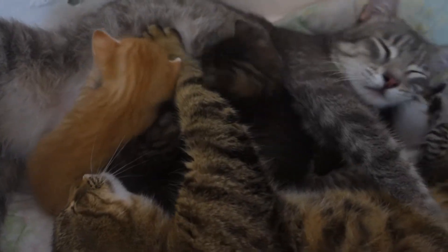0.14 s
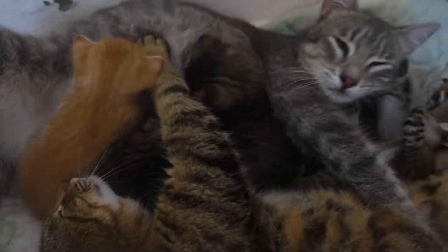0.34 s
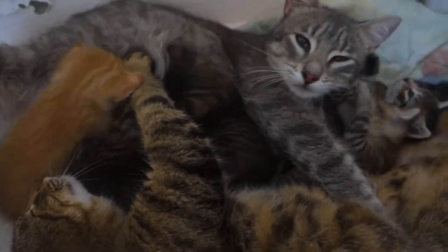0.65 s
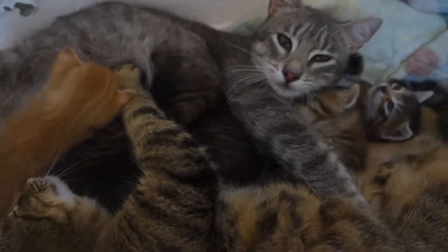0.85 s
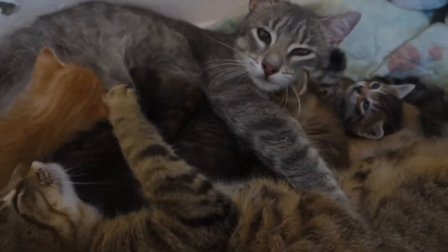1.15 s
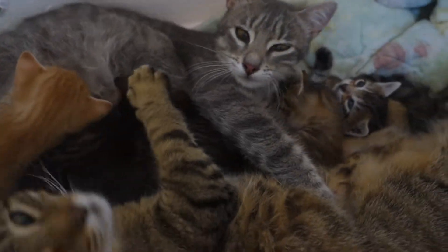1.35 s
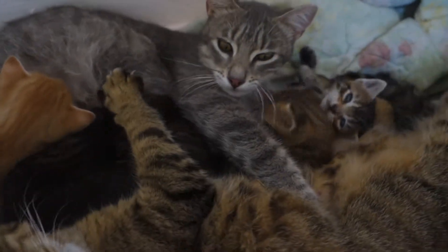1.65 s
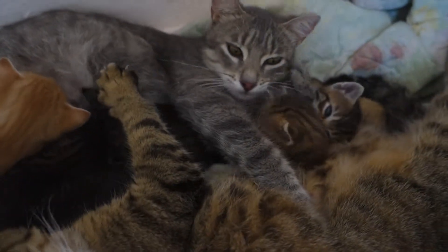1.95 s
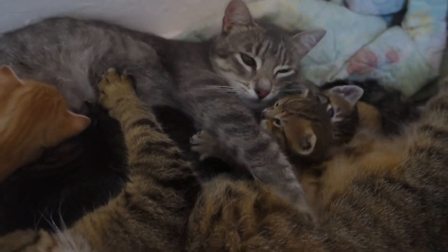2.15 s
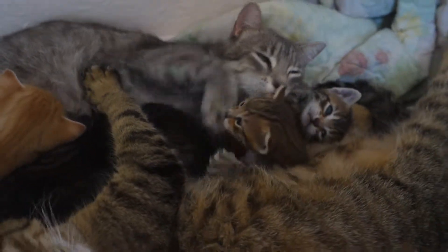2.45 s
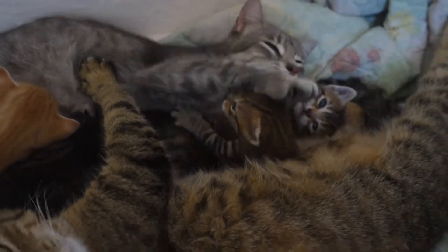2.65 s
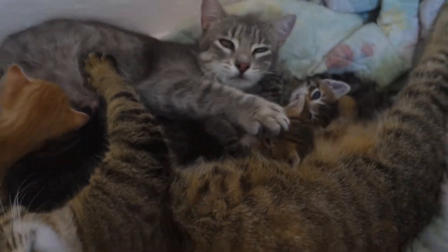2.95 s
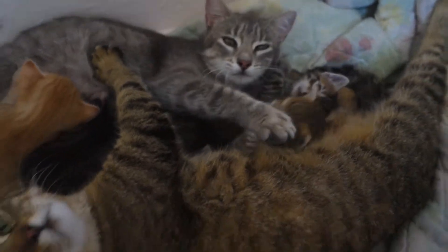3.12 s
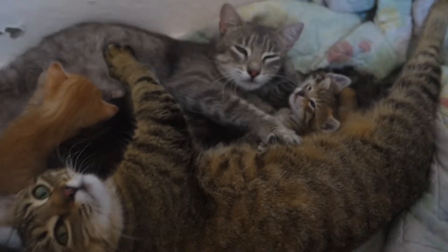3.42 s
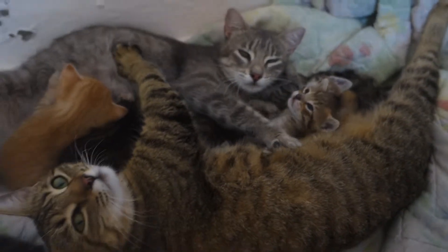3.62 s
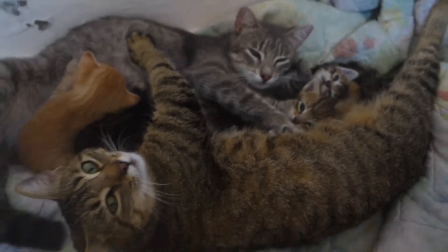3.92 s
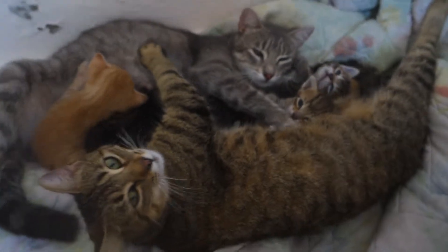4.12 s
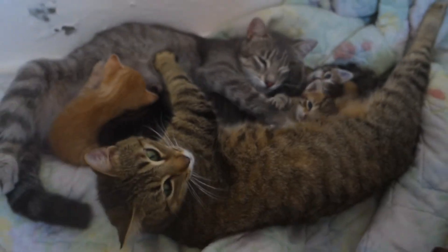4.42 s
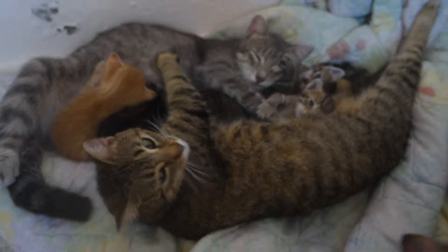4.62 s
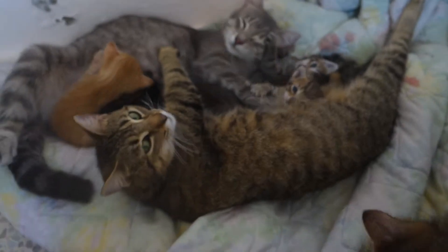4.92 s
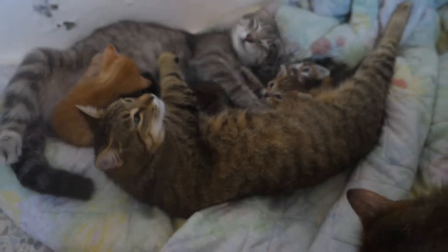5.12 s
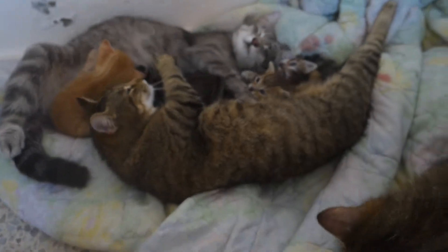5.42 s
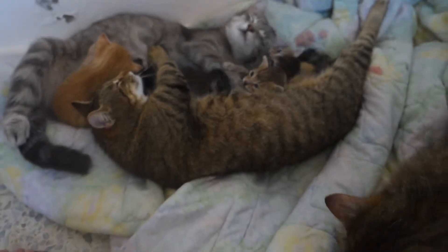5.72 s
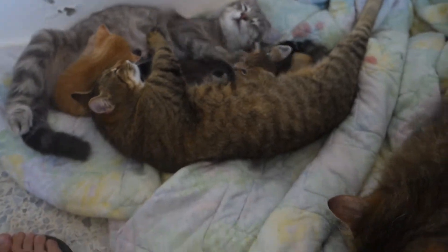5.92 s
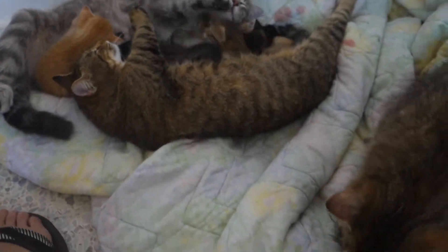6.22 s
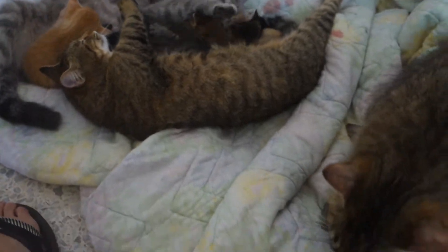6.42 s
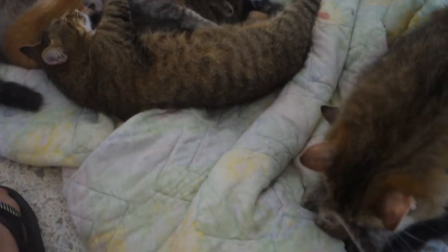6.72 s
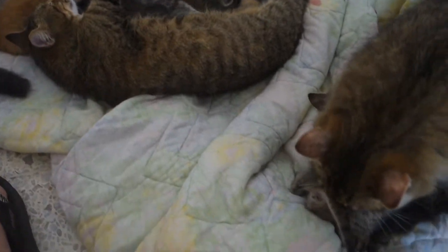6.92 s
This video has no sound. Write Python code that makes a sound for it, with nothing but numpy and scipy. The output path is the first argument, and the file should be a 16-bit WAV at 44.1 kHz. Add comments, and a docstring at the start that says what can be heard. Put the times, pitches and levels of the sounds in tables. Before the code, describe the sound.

Four high kitten calls, spaced one to two seconds apart, ring for about a second off hard walls. Between them an adult cat makes three soft, fluttering, low-pitched trills. The microphone is close on the bedding, catching brushing fur, a few tiny claw snags and faint whistling tones, over a steady low hum with shifting rumble and soft hiss. The second mew and the loudest ticks sit to the left.

```python
"""Mains hum, air rumble and microphone hiss lie under all, as sines and band-shaped noise, while a kitten
on a bed in a bare, echoing room is already in its first of four mews: partials coloured by a throat.
Bedding rustles as grainy noise; a grown cat answers in three rolled trills, a low voice chopped into puffs.
Thin whistles glide by as single sines; a few claw ticks, scattered among the calls, are noise snaps and
short ringing modes. Decaying noise, convolved with the voices, whistles and ticks, gives the echo."""
import sys
import numpy as np
from scipy import signal
from scipy.io import wavfile

SR = 44100
rng = np.random.default_rng(int(sys.argv[2]) if len(sys.argv) > 2 else 0)


def generate_wav(signal):
    """Clip the signal to [-1, 1] and save it as 16-bit WAV at the path in sys.argv[1]."""
    frames = np.transpose(np.atleast_2d(signal))
    scaled = np.clip(frames, -1, 1) * 32767
    pcm = np.round(scaled).astype(np.int16)
    wavfile.write(sys.argv[1], SR, pcm)


N = 311326   # samples


def amp(db):
    """Level law: decibels to amplitude gain."""
    return 10 ** (np.asarray(db) / 20)


def rms_one(x):
    """Normalisation: scale to an rms of 1."""
    return x / np.sqrt(np.mean(x ** 2) + 1e-20)


def in_time(rows, t):
    """Linear interpolation: the columns of a curve at times t."""
    s, *columns = np.transpose(rows)
    return [np.interp(t, s, c) for c in columns]


def at_hz(points, hz):
    """Spectral interpolation: read a curve on a log-frequency axis."""
    point_hz, value = np.array(points).T
    return np.interp(np.log(hz), np.log(point_hz), value)


def drift(rate_hz, size):
    """Slow random modulation: noise through two one-pole low-passes, run in, zero mean and spread 1."""
    r = np.exp(-2 * np.pi * rate_hz / SR)
    slow = signal.lfilter([1], [1, -2 * r, r * r], rng.standard_normal(size + SR))[SR:]
    return rms_one(slow - slow.mean())


def band_noise(low_hz, high_hz, size, order=2):
    """Band-limited noise: white noise through a band-pass, run in, rms 1."""
    sos = signal.butter(order, [low_hz, high_hz], "band", fs=SR, output="sos")
    return rms_one(signal.sosfilt(sos, rng.standard_normal(size + 8000))[8000:])


def running_phase(hz):
    """Phase is the time integral of frequency, in radians."""
    return 2 * np.pi * np.cumsum(hz) / SR


def panned(x, pan_db):
    """Interchannel level difference: two channels, left minus right in dB."""
    return np.array([x * amp(pan_db / 2), x * amp(-pan_db / 2)])


LEAD = int(.2 * SR)   # samples before the start, so that earlier sound still echoes


def span(start_s, end_s, fade_s):
    """Envelope gating: sample indices (lead-in counted), times and soft ends of one event."""
    t = np.arange(int(start_s * SR), min(int(end_s * SR), N)) / SR
    ends = np.clip(np.minimum(t - t[0], t[-1] - t) / fade_s, 0, 1)
    return np.round(t * SR).astype(int) + LEAD, t, ends


# interchannel likeness of diffuse noise: (frequency_hz, likeness from -1 to 1)
CHANNEL_LIKENESS = [(60, 1.0), (150, 1.0), (380, 0.97), (950, 0.81), (2380, 0.44), (5980, -0.047),
                    (15000, -0.16)]


def bands(size):
    """Interchannel coherence: third-octave stereo noise with its centre, the channels alike in the bass."""
    edges_hz = 20 * 2 ** np.arange(0, 9.8, 1 / 3)
    white = rng.standard_normal((2, 2, size))   # neighbouring bands get unrelated noise
    for k, (low, high) in enumerate(zip(edges_hz, edges_hz[1:])):
        sos = signal.butter(2, [low, high], "band", fs=SR, output="sos")
        mid, side = signal.sosfilt(sos, white[k % 2])
        hz = np.sqrt(low * high)
        alike = np.clip(at_hz(CHANNEL_LIKENESS, hz), -1, 1)
        yield hz, np.sqrt(1 + alike) * mid + np.sqrt(1 - alike) * side * [[1], [-1]]


# levels of the two rumbles of the house: (time_s, low_band_db, upper_band_db)
RUMBLE_LEVELS = [(0, -46.5, -55.5), (1.8, -48, -55), (2.3, -48, -89), (2.9, -45.5, -53.5),
                 (3.4, -48.5, -75.5), (5.56, -51.5, -51), (6.35, -53, -52), (6.7, -51.5, -47.5),
                 (7.06, -51.5, -49)]
# relative spectral density of air and hiss: (frequency_hz, density_db_per_hz)
AIR_SPECTRUM = [(12, -38), (20, -23), (44, -14), (66, -9.5), (80, 0), (100, -12.5), (130, -21),
                (208, -24.5), (283, -16), (601, -25), (1140, -27), (1510, -35), (2710, -39.5), (3200, -45),
                (8040, -50.5), (15700, -50.5)]
AIR_DB = -43.5
HUM_HZ, HUM_DB, HUM_FADE_DB_PER_S = 60, -34.5, 0.22


def background(patchy_db):
    """Superposition of lasting sources: a slowly fading hum, two changing rumbles, and air with hiss."""
    t = np.arange(N) / SR
    low_db, upper_db = in_time(RUMBLE_LEVELS, t)
    hum = np.sqrt(2) * amp(HUM_DB - HUM_FADE_DB_PER_S * t) * np.sin(2 * np.pi * HUM_HZ * t)
    rumble = amp(low_db) * band_noise(67.0, 185, N, order=5)
    rumble += amp(upper_db) * band_noise(217.7, 263.4, N, order=4)
    air = sum(amp(at_hz(AIR_SPECTRUM, hz)) * noise for hz, noise in bands(N))
    return hum + rumble + amp(AIR_DB + patchy_db * drift(2.4, N)) * rms_one(air)


# throat and mouth without the two resonances: (frequency_hz, gain_db)
THROAT_COLOUR = [(600, -22), (1100, -13), (1400, -6), (2000, -4.5), (2600, 1), (3400, -0.5), (4500, 1),
                 (5200, -8), (6000, -3.5)]
LOWER_WIDTH_HZ, UPPER_WIDTH_HZ = 220, 142   # half-widths of the resonance curves


def throat_db(hz, lower_hz, lower_db, upper_hz, upper_db):
    """Vocal-tract filtering: a smooth colour with two resonances on it."""
    lower = lower_db / (1 + ((hz - lower_hz) / LOWER_WIDTH_HZ) ** 2)
    upper = upper_db / (1 + ((hz - upper_hz) / UPPER_WIDTH_HZ) ** 2)
    return at_hz(THROAT_COLOUR, hz) + lower + upper


# course of each mew, before the throat: (time_s, pitch_hz, level_db, opening_db),
# the mouth opening being a gain of partials 3 and up; the first mew is already under way
MEW_COURSES = [
    [(-0.13, 696, -52, -7), (-0.06, 1100, -50.5, -6), (-0.015, 1263, -46, 5.5), (0.025, 1398, -46, -1.5),
     (0.055, 1423, -48.5, 2), (0.09, 1432, -48, -1.5), (0.13, 1438, -38, -12.5), (0.145, 1445, -54.5, -7),
     (0.22, 1454, -52.5, -21), (0.29, 1357, -52, -22), (0.33, 1164, -37.5, -6), (0.36, 1049, -47, -21)],
    [(1.23, 1128, -41.5, -10), (1.275, 1315, -60, 2), (1.32, 1363, -51, 7), (1.35, 1473, -45.5, -4.5),
     (1.41, 1490, -41, -10.5), (1.47, 1496, -36.5, -13.5), (1.55, 1449, -37.5, -14),
     (1.65, 1409, -46, -16.5), (1.76, 1353, -44.5, -17.5), (1.83, 1265, -44, -16), (1.87, 1166, -41, -12),
     (1.9, 1040, -28, -29)],
    [(3.42, 501, -56, -36), (3.47, 830, -56, -46), (3.51, 1014, -62, -11), (3.545, 1184, -60, -4.5),
     (3.58, 1290, -55.5, 4), (3.62, 1347, -58, -3), (3.7, 1382, -50.5, -2), (3.75, 1357, -45, -8.5),
     (3.81, 1416, -48.5, -1), (3.93, 1395, -52, -12), (4.0, 1352, -57, -9), (4.07, 1270, -59, -19),
     (4.11, 1121, -32, -16)],
    [(5.83, 637, -46, -23), (5.888, 1036, -51, -15.5), (5.922, 1140, -50, -0.5), (5.952, 1286, -44, 8),
     (5.985, 1330, -45.5, 5), (6.03, 1440, -47.5, 8), (6.13, 1459, -42, -5.5), (6.175, 1441, -39.5, -10),
     (6.225, 1420, -39.5, -13), (6.26, 1375, -62, -42), (6.35, 1330, -54, -21), (6.41, 1198, -50, -26)],
]
# fast pitch flutter of each mew: (share_of_pitch), scaled up for the higher partials
FLUTTER_SHARES = [.002, .0055, .005, .0012]
# strength of the partials above the fourth in each mew: (gain_db)
BRIGHTNESS = [-4, -2, -5, 0]
# pose and throat of each mew: (left_minus_right_db, fundamental_gain_db, echo_gain_db (facing away gives more),
# lower_resonance_hz, lower_gain_db, upper_resonance_hz, upper_gain_db)
POSES = [(-1.5, 2.5, -2, 2870, 14, 3830, 16.9), (-12.5, -6, -0.5, 2806, 8.1, 4150, 7.1),
         (-7, 7, -1, 2790, 12.5, 4130, 7.6), (-5, 7.5, -7.5, 2870, 10, 3935, 14.5)]
# partials above the fourth, against the fourth: (frequency_hz, gain_db)
UPPER_PARTIALS = [(4000, -24), (6500, -2.5), (8500, -25), (11000, -16), (14000, -15), (16000, -20)]
SHUT_LIFT = .35       # the fundamental gains this share of the dB lost above as the mouth closes
CUTOFF_HZ = 16050


def mews(jitter, breath_db, air_db):
    """Source and filter: throat-coloured partials with breath in the gaps; direct sound and wall feed."""
    out, to_walls = np.zeros((2, LEAD + N)), np.zeros((2, LEAD + N))
    for rows, flutter, bright_db, pose in zip(MEW_COURSES, FLUTTER_SHARES, BRIGHTNESS, POSES):
        pan_db, low_db, echo_db, *peaks = pose
        at, t, ends = span(rows[0][0], rows[-1][0], .035)
        hz, db, open_db = in_time(rows, t)
        mouth_gains_db = [low_db - SHUT_LIFT * open_db, 0, open_db, open_db]
        levels = [db + throat_db(k * hz, *peaks) + gain_db for k, gain_db in enumerate(mouth_gains_db, 1)]
        for k in range(5, 15):
            silence_db = 99 * (k * hz > CUTOFF_HZ)
            levels.append(levels[3] + bright_db + at_hz(UPPER_PARTIALS, k * hz) - silence_db)
        phase = running_phase(hz * (1 + jitter * drift(8.1, len(t))))
        fray = running_phase(hz * flutter * band_noise(30, 110, len(t)))
        mouth = np.clip((t[-1] - t) / .09, 0, 1) ** 2   # the mouth shuts and the overtones go first
        voice = amp(levels[0]) * np.sin(phase)
        # uneven closing of the folds frays the higher partials most
        for k, partial_db in enumerate(levels[1:], 2):
            voice += mouth * amp(partial_db) * np.sin(k * (phase + min(k - 1.5, 1.5) * fray))
        voice += amp(levels[1] + breath_db) * band_noise(1500, 7700, len(t))
        voice += amp(levels[3] + air_db) * band_noise(4000, 21000, len(t))
        call = np.sqrt(2) * ends * voice
        out[:, at] += panned(call, pan_db)
        to_walls[:, at] += amp(echo_db) * call
    return out, to_walls


# reverberation time: (frequency_hz, t60_s)
REVERBERATION = [(300, 0.4), (600, 1.23), (1400, 1.24), (2800, 1.373), (3500, 1.21), (4200, 1.01),
                 (8000, 1.02), (16000, 0.16)]
# lean of the echo: (frequency_hz, left_minus_right_db)
ECHO_LEAN = [(400, -3), (1400, -1), (4000, -6)]


def room(x, gap_s):
    """Diffuse reverberation: dense echoes of hard walls as noise that dies exponentially, band by band."""
    t = np.arange(int(1.5 * SR)) / SR
    echoes = np.zeros((2, len(t)))
    for hz, noise in bands(len(t)):
        decay = amp(-60 * t / at_hz(REVERBERATION, hz))
        echoes += noise * panned(decay, at_hz(ECHO_LEAN, hz))
    echoes = echoes * np.clip(t / gap_s, 0, 1)   # the first echoes need time to arrive
    echoes = echoes / np.sqrt(np.sum(echoes ** 2) / 2)
    return signal.fftconvolve(x.mean(axis=0, keepdims=True), echoes, axes=1)[:, :LEAD + N]


# fur and bedding rustle: (start_s, length_s, level_db)
BRUSHES = [(0.401, 0.76, -65.5), (1.138, 0.68, -61), (1.717, 0.41, -63), (2.599, 0.23, -61.5),
           (4.48, 0.17, -68), (4.718, 0.096, -52), (5.837, 0.14, -49)]
# relative spectral density of the rustle: (frequency_hz, density_db_per_hz)
RUSTLE_SPECTRUM = [(1500, -22), (3000, -6), (6500, -1), (9000, -5), (12500, 0), (16000, -2)]


def rustles(grain_db):
    """Friction noise: short brushes of bright noise with a grainy, random level."""
    gain = np.zeros(LEAD + N)
    for s, length_s, db in BRUSHES:
        at, t, ends = span(s, s + length_s, 0.09)
        gain[at] += ends * amp(db)
    noise = sum(amp(at_hz(RUSTLE_SPECTRUM, hz)) * band for hz, band in bands(N))
    grainy = rms_one(noise * amp(grain_db * drift(60, N)))
    return gain[LEAD:] * grainy * amp([[-1.2], [1.2]])   # leans right


# course of each trill, before the rolls: (time_s, pitch_hz, level_db, overtones_against_fundamental_db)
TRILL_COURSES = [
    [(0.5, 382.4, -49, -0.5), (0.58, 412.9, -29, -32), (0.67, 359.8, -33.5, -16.5),
     (0.786, 421.3, -31, -13.5), (0.914, 483.2, -32, -12.5), (0.982, 496.3, -35, -18.5),
     (1.07, 504, -43, -15)],
    [(2.82, 317.5, -56, -25), (2.88, 369.4, -39.5, -31), (2.95, 378, -41.5, -27), (3.0, 408, -35, -23),
     (3.05, 323, -67, -9)],
    [(5.36, 303.4, -57, -26), (5.416, 404.5, -38, -29), (5.47, 436.8, -36.5, -27), (5.55, 411, -34.5, -21)],
]
# rolling of each trill: (first_roll_s, rolls_per_s, rattle_against_level_db)
TRILL_ROLLS = [(0.53, 29, -7), (2.85, 33, -6), (5.393, 29, -5)]
ROLL_UNEVEN, ROLL_SPREAD_DB = .12, 2.5   # scatter of the roll spacing (share) and strength


def trills(jitter, puff_s, between, nose_db):
    """Amplitude modulation: a closed-mouth voice chopped about thirty times a second, with a noisy rattle."""
    out = np.zeros(LEAD + N)
    for rows, (first_s, rate, rattle_db) in zip(TRILL_COURSES, TRILL_ROLLS):
        at, t, ends = span(rows[0][0], rows[-1][0], 0.039)
        early, strong = rng.standard_normal((2, 20))
        rolls_s = first_s + (np.arange(len(early)) + ROLL_UNEVEN * early) / rate
        bumps = np.exp(-.5 * ((t - rolls_s[:, None]) / puff_s) ** 2)
        puffs = between + amp(ROLL_SPREAD_DB * strong) @ bumps
        hz, db, over_db = in_time(rows, t)
        phase = running_phase(hz * (1 + jitter * drift(39, len(t))))
        # the puffs act on the overtones here and on the whole voice below
        voice = np.sin(phase) + amp(over_db) * puffs * (np.sin(2 * phase) + np.sin(3 * phase))
        voice += amp(rattle_db) * band_noise(306, 521, len(t), order=4)
        voice += amp(rattle_db + nose_db) * band_noise(540, 1565, len(t), order=4)
        out[at] += ends * amp(db) * puffs * voice
    return panned(out, -.3)


# thin whistles: (start_s, length_s, first_hz, last_hz, loudest_db before flicker)
WHISTLE_GLIDES = [(0.95, 0.32, 6950, 6360, -63), (1.377, .24, 3520, 3420, -53.5),
                  (3.767, 0.416, 3447, 3500, -55)]
WHISTLE_PEAK, WHISTLE_FALL_DB = 0.2, 34   # loudest at this share of the length; fall per whole length
WHISTLE_FLICKER_DB = 5


def whistles(jitter):
    """Frequency glide: faint single wavering tones that swell and fade."""
    out = np.zeros(LEAD + N)
    for s, length_s, first_hz, last_hz, top_db in WHISTLE_GLIDES:
        at, t, ends = span(s, s + length_s, 0.0097)
        done = (t - s) / length_s
        hz = first_hz + (last_hz - first_hz) * done
        db = top_db - WHISTLE_FALL_DB * np.abs(done - WHISTLE_PEAK)
        db += WHISTLE_FLICKER_DB * drift(15.6, len(t))
        out[at] += ends * amp(db) * np.sin(running_phase(hz * (1 + jitter * drift(40, len(t)))))
    return panned(out, -4.0)


# claw ticks: (start_s, level_db, left_minus_right_db, relative_treble_db)
CLAW_TICKS = [(1.7759, -32, -3, -45), (4.7029, -27.5, -15.5, -12.5), (4.7752, -27.5, -19.5, -29),
              (4.9544, -50, -11, -16), (5.005, -51, -11, -19), (5.76, -49.5, -14, -14)]
# modes that each click excites: (frequency_hz, relative_level_db, t60_s)
CLAW_MODES = [(1700, -16, 0.00067), (2935, 4.5, 0.0076), (3820, 2, 0.0041), (4520, -19, 0.0036),
              (7540, -26, 0.0023)]


def ticks(snap_s):
    """Impulsive modal excitation: a claw snags in a noise snap and a double click into a few short modes."""
    out, t = np.zeros((2, LEAD + N)), np.arange(int(.02 * SR)) / SR
    for s, db, pan_db, treble_db in CLAW_TICKS:
        bright_noise = np.diff(rng.standard_normal(len(t) + 1))
        snap = bright_noise * t / snap_s * np.exp(1 - t / snap_s)
        tick = amp(treble_db + 6.5) * snap
        for hz, mode_db, t60 in CLAW_MODES:
            for late_s in (0, .0012):
                since = np.maximum(t - late_s, 0)
                ring_db = mode_db - 8.5 + rng.normal(0, 1) - 60 * since / t60
                tick += amp(ring_db) * np.sin(2 * np.pi * hz * since)
        i = int(s * SR) + LEAD
        out[:, i:i + len(t)] += panned(amp(db) * tick, pan_db)
    return out


def scene():
    """Superposition: direct voices, whistles and ticks, their echo, the rustles and the background."""
    steady = background(patchy_db=.3)
    # jitter is a share of the pitch
    kitten, kitten_away = mews(jitter=.002, breath_db=-42, air_db=-19)
    brushes = rustles(grain_db=1.5)
    cat = trills(jitter=.011, puff_s=.007, between=.6, nose_db=-10)
    thin = whistles(jitter=0.0014)
    claws = ticks(snap_s=0.00084)
    echoed = kitten_away + amp(5) * thin + amp(-10) * cat + amp(-20) * claws
    wet = room(echoed, gap_s=0.01)
    voices = (kitten + cat + thin + claws + wet)[:, LEAD:]
    return voices + brushes + steady


def record(dry):
    """Low-pass filtering: the top is cut steeply."""
    return signal.sosfilt(signal.cheby2(18, 45, CUTOFF_HZ, fs=SR, output="sos"), dry)


dry = scene()
out = record(dry)
generate_wav(out)
```